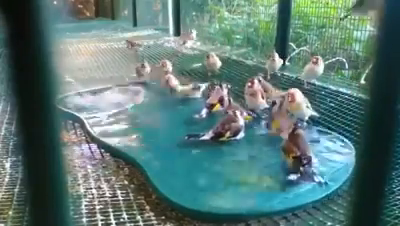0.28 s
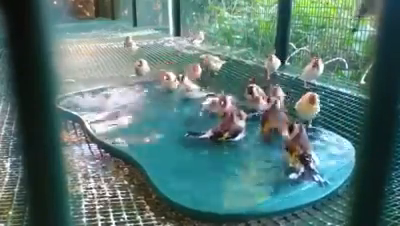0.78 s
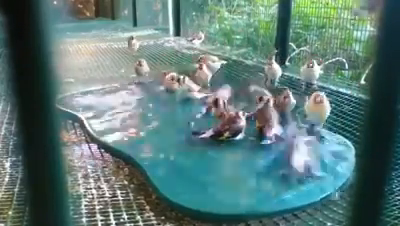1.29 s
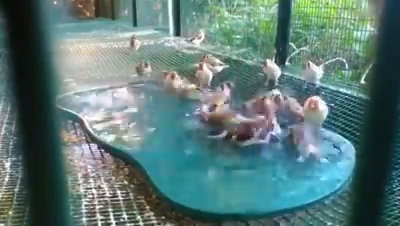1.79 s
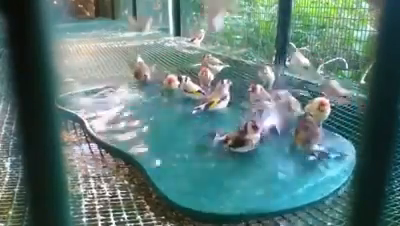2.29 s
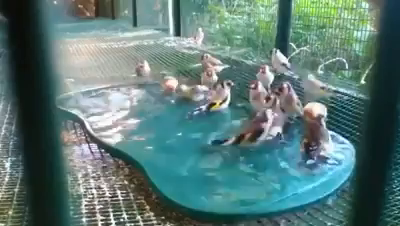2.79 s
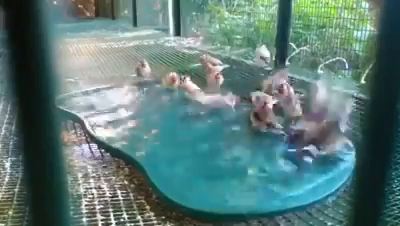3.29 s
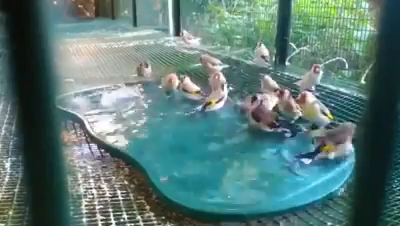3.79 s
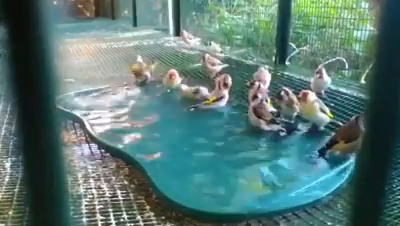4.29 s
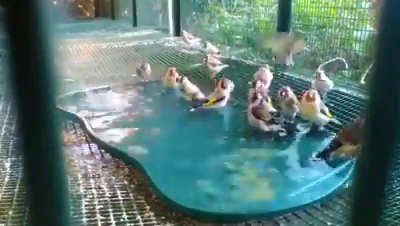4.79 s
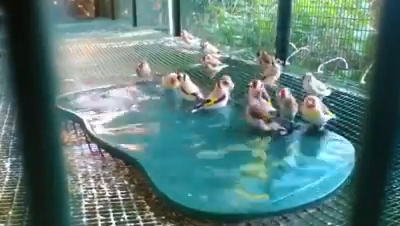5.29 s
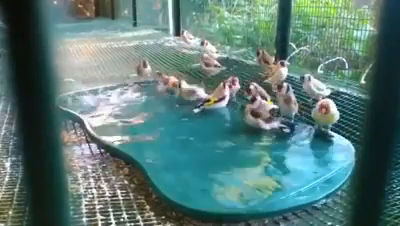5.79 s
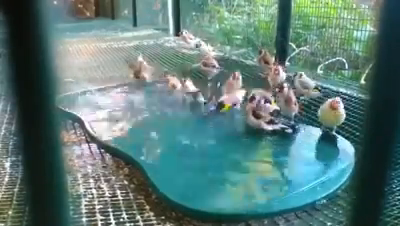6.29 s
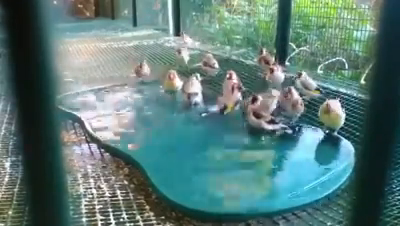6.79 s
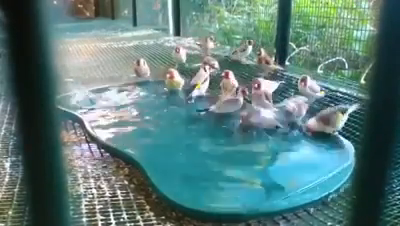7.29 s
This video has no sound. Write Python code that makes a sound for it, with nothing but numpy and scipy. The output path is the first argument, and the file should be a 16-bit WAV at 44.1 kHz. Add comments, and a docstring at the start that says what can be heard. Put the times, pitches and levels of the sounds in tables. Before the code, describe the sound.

A flock of small finches bathes in a shallow tray inside an aviary. A wet plop opens, then soft pattering, fizzing droplets and ragged wing flutter continue throughout. Near two seconds a hollow object is knocked and rattles, the hardest knock at about two and a half seconds, amid quick high chirps. Afterwards it quietens to scattered splashes and bubbles, with a small clatter on the wire mesh near the end. Close pickup, short cage echo.

```python
"""Small finches bathe in a shallow tray of water in an aviary: beating wings throw spray and droplets.
The splashing is shaped noise and random impacts; bubbles and plops are short rings that swell and die.
Chirps are gliding sines with rasp, and wing flurries are ragged bands of noise that sink in pitch.
Now and then something hollow is knocked and rattles as a set of decaying modes, and a bird lands on
the mesh, a bank of noisy resonances. The cage rings along and the walls give a short echo."""
import sys
import numpy as np
from scipy import signal
from scipy.fft import rfft, irfft
from scipy.io import wavfile

SR = 44100
rng = np.random.default_rng(int(sys.argv[2]) if len(sys.argv) > 2 else 0)


def output_pcm(signal):
    """Save a mono or channel-first signal as 16-bit PCM at the path in sys.argv[1].

    Samples are clipped to [-1, 1] before scaling.
    """
    pcm = np.clip(np.atleast_2d(signal).T, -1, 1) * 32767
    wavfile.write(sys.argv[1], SR, np.round(pcm).astype(np.int16))


N = 331632
T = np.arange(N) / SR
LEAD_S = 0.03  # time allowed for a sound to build up before its peak
WINGBEAT_HZ = 21.4  # middle rate of the beating wings

# how busily the flock bathes: (time [s], level [dB])
BATHING_LEVEL = [(0, -48), (.14, -48), (.3, -46.5), (.7, -47.5), (1.3, -49), (2.05, -45), (2.35, -46),
                 (3.1, -50), (3.4, -46.5), (3.6, -50), (4.12, -52), (4.28, -54), (4.42, -51.5),
                 (4.95, -50.5), (5.2, -47), (5.5, -49.5), (6.25, -47), (6.55, -51), (6.9, -47.5),
                 (7.52, -50)]


def amp(db):
    """Decibels to gain."""
    return 10 ** (np.asarray(db) / 20)


def unit(x):
    """Scale to rms 1."""
    return x / np.sqrt(np.mean(x ** 2))


def add(out, s, x):
    """Mix x into out from time s."""
    i = int(s * SR)
    x, i = x[max(-i, 0):], max(i, 0)
    out[i:i + len(x)] += x[:max(N - i, 0)]


def band(x, low_hz, high_hz, order=2):
    """Band-pass."""
    edges = np.clip([low_hz, max(high_hz, low_hz + 20)], 10, SR / 2 - 10)
    return signal.sosfilt(signal.butter(order, edges, "band", fs=SR, output="sos"), x)


def colour(x, points):
    """Shape by a spectrum of (frequency [Hz], level [dB]) points."""
    hz, db = np.transpose(points)
    f = np.maximum(np.fft.rfftfreq(N, 1 / SR), 1)
    return irfft(rfft(x) * amp(np.interp(np.log(f), np.log(hz), db)), N)


def walk(rate_hz):
    """Smooth random drift of spread 1 that takes a new value rate_hz times a second."""
    knots = rng.standard_normal(N // 10)
    return np.interp(T * rate_hz, np.arange(len(knots)), knots) * np.sqrt(3 / 2)


def swell(t, rise_s, decay_s):
    """Envelope that grows towards time 0 and dies away after it."""
    return np.exp(np.minimum(t / rise_s, -t / decay_s))


def grit(n, grain_db=4, size=30):
    """Noise broken into tiny grains (size in samples) of uneven strength."""
    grains = np.repeat(np.clip(rng.standard_normal(n // size + 1), -2, 2), size)[:n]
    return rng.standard_normal(n) * amp(grain_db * grains)


def impacts(per_s, spread_db):
    """Randomly timed droplet impacts, mostly small with a few large."""
    size = amp(spread_db * np.minimum(rng.exponential(size=N), 4))
    return (rng.random(N) < per_s / SR) * size * rng.choice([-1, 1], N)


def bubble(hz, swell_s, glide=0.00082):
    """A trapped air pocket gives a short ring, practically steady in pitch, that swells and dies away."""
    t = T[:int(10 * swell_s * SR) + 2]
    age = t / swell_s
    envelope = age ** 2 * np.exp(2 - 2 * age)
    return envelope * np.sin(2 * np.pi * hz * t * (1 + glide * (age - 1)))


def aviary(x, room_db=-11, room_t60_s=0.32, treble_t60_s=0.31, build_s=0.0041, ring_db=-1):
    """The cage rings along; near surfaces answer, then a diffuse tail, lows and treble fading almost as one."""
    # thin resonances of the cage that every sound sets off: (frequency [Hz], width [Hz], level [dB])
    cage_modes = [(800, 12, -13), (1745, 10, 1.5), (2106, 42, -0.5), (2810, 23, -14.5), (3000, 17, -18),
                  (3214, 52, -7.5), (3830, 43, -4), (5050, 17, -2.5), (6100, 190, -10)]
    # early reflections off floor and near walls: (delay [s], level [dB])
    reflections = [(.0051, -17.5), (.0084, -22.5), (0.023, -25)]
    ringing = sum(amp(db + ring_db) * band(x, hz - width / 2, hz + width / 2, order=1)
                  for hz, width, db in cage_modes)
    x = x + ringing
    t = T[:SR * 2 // 3]
    low = band(rng.standard_normal(len(t)), 110, 3800) * amp(-60 * t / room_t60_s)
    treble = band(rng.standard_normal(len(t)), 3900, 10000) * amp(-60 * t / treble_t60_s)
    tail = (low + treble) * (1 - np.exp(-t / build_s))
    response = amp(room_db) * tail / np.linalg.norm(tail)
    for s, db in reflections:
        response[int(s * SR)] += amp(db)
    return x + signal.fftconvolve(x, response)[:N]


def rattle(count=6, uneven=0.4, scatter_db=3, hard_db=-16, spot_hz=1018, wander=0.02):
    """The hollow thing chatters in soft, uneven taps: (time [s], level [dB], hardness [dB], pitch [Hz])."""
    # runs of taps: (time [s], level [dB], time between taps [s])
    runs = [(2.133, -34.5, 0.035), (2.29, -39.5, 0.034), (2.949, -40, 0.034)]
    taps = []
    for s, db, gap_s in runs:
        for k, (late, size, spot) in enumerate(rng.uniform(-1, 1, (count, 3))):
            tap_s = s + gap_s * (k + uneven * late)
            taps.append((tap_s, db + scatter_db * size, hard_db, spot_hz * (1 + wander * spot)))
    return taps


def knocks(peak_s=0.0047, width_s=0.0035, cluster_db=-19, cluster_s=0.039, build_s=0.0036,
           crack_db=-17, crack_s=0.031, rasp_db=-27, rasp_s=0.012, thud_db=-47, thud_s=0.0087,
           soft_hz=1200, push_s=0.00066, brush_s=0.007, detune=0.013, scatter_db=2):
    """A blow tocks at the struck spot's pitch, then modes ring in a fresh mix; soft blows lack high ones."""
    # hollow knocks, bounces and taps: (time [s], level [dB], hardness [dB], pitch at the struck spot [Hz])
    blows = [(1.7408, -15, -10.5, 994), (1.7522, -19, -10, 1027), (1.7604, -19.5, -7, 1140),
             (2.143, -29, -21, 1030), (2.168, -31, -27, 1030), (2.185, -24, -28, 1023),
             (2.218, -40, -16.5, 965), (2.251, -29, -21, 1047), (2.275, -35, -17, 1090),
             (2.313, -29.5, -10, 1100), (2.333, -32.5, -17, 975), (2.459, -36.5, 4.5, 985),
             (2.5082, -8.5, -3, 976), (2.5167, -18.5, -3.5, 1080), (2.5280, -22, 3.5, 1045),
             (2.5382, -20, -9, 1054), (2.548, -30, -11.5, 1030), (2.562, -36, -1, 1005),
             (2.570, -36, -12, 985), (2.883, -39, -5, 1030), (2.972, -29.5, -7.5, 1075),
             (2.986, -38, 0, 1210), (3.048, -31.5, -13, 1030), (3.062, -35, -3, 1095),
             (3.288, -39.5, -13, 990)]
    # what the knocked thing rings with: (frequency [Hz], level [dB], time to fall 60 dB [s])
    hollow_modes = [(347, -43, 0.067), (505, -30, 0.15), (582, -41, 0.065), (828, -16.5, 0.039),
                    (947, -23, 0.36), (1120, -28, 0.15), (1188, -17.5, 0.17), (1680, -21.5, 0.21),
                    (2030, -20, 0.11), (2310, -8.5, 0.088), (2450, -15, 0.066), (3060, -19.5, 0.15),
                    (3750, -6, 0.018), (3800, -10, 0.05)]
    # its crowd of close modes, which beat unevenly as they fade: (low edge [Hz], high edge [Hz])
    cluster_edges = (880, 1177)
    out, t = np.zeros(N), T[:SR // 2] - LEAD_S
    n, age = len(t), np.maximum(t, 0)
    for s, db, hard_db, spot_hz in blows + rattle():
        tock = np.exp(-((t - peak_s) / width_s) ** 2) * np.sin(2 * np.pi * spot_hz * t)
        ring = 0
        for hz, mode_db, t60 in hollow_modes:
            size, shift, phase = rng.standard_normal(3)
            octaves_up = max(np.log2(hz / soft_hz), 0)
            gain = amp(mode_db + scatter_db * size + hard_db * octaves_up)
            tone = np.sin(2 * np.pi * (hz * (1 + detune * shift) * age + phase))
            ring = ring + gain * amp(-60 * age / t60) * tone
        cluster = unit(band(rng.standard_normal(n), *cluster_edges, order=3))
        cluster = cluster * (1 - np.exp(-age / build_s)) * np.exp(-age / cluster_s)
        # the contact scrapes a little before it lands, and the floor gives a faint thud
        crack = unit(band(grit(n), 670, 2830)) * swell(t, brush_s, crack_s)
        rasp = unit(band(grit(n), 4300, 6600)) * swell(t, brush_s, rasp_s)
        thud = unit(band(rng.standard_normal(n), 25, 160)) * swell(t, brush_s, thud_s)
        body = tock + (1 - np.exp(-age / push_s)) * ring + amp(cluster_db) * cluster + amp(thud_db) * thud
        contact = amp(hard_db) * (amp(crack_db) * crack + amp(rasp_db) * rasp)
        add(out, s - LEAD_S, amp(db) * (body + contact))
    return out


def landing(ring_s=0.07, ring_db=-17, rise_s=0.00076, damping=-0.62):
    """Each footfall sets the wire mesh clattering; its low resonances ring on after the high ones."""
    # a bird lands on the wire mesh and shakes it: (time [s], level [dB], decay time [s])
    footfalls = [(6.938, -28, 0.034), (6.949, -24.5, 0.016), (6.9669, -23.5, .012), (7.002, -29, 0.018)]
    # what the mesh rings with: (frequency [Hz], width [Hz], level [dB])
    mesh_modes = [(470, 220, -1.5), (873, 200, -4), (1150, 200, -4.5), (1460, 140, -5.5), (1804, 190, 2),
                  (2160, 210, -2), (2480, 89, 3.5), (2840, 190, 1), (3350, 540, -7)]
    out, t = np.zeros(N), T[:SR // 2] - LEAD_S
    middle_hz = np.median(np.array(mesh_modes)[:, 0])
    for s, db, decay_s in footfalls:
        wires = [amp(mode_db) * band(grit(len(t)), hz - width / 2, hz + width / 2)
                 for hz, width, mode_db in mesh_modes]
        clatter = 0
        for wire, (hz, _, _) in zip(wires, mesh_modes):
            longer = (hz / middle_hz) ** damping  # decay time goes as pitch to this power
            strike = swell(t, rise_s, decay_s * longer)
            after_ring = amp(ring_db) * swell(t, rise_s, ring_s * longer)
            clatter = clatter + wire * (strike + after_ring)
        add(out, s - LEAD_S, amp(db) * clatter / np.std(sum(wires)) / 2)
    return out


def chirps(waver=0.071, rasp_db=-7, flutter_db=2.5, rasp_octaves=0.18):
    """Gliding whistles and quick strokes; rough ones waver in pitch and strength and break into a rasp."""
    # high chirps and a few low, soft tones near 800-1000 Hz, perhaps the hollow thing ringing:
    # (time [s], level [dB], length [s], start pitch [Hz], end pitch [Hz], roughness [0-1])
    whistles = [(0.402, -32.5, 0.017, 1790, 1810, 0.16), (1.474, -44.5, .025, 5470, 5640, 0.5),
                (1.734, -43.5, 0.038, 6250, 6380, 0.16), (1.896, -42.5, 0.057, 957, 884, 0.25),
                (1.937, -40.5, 0.016, 4710, 4900, 0.1), (1.973, -38.5, 0.061, 2740, 3160, 0.08),
                (2.173, -33, 0.036, 5640, 5870, 0.2), (2.239, -32, 0.035, 3686, 3610, 0.26),
                (2.309, -23, .0046, 2830, 3600, 0.3), (2.318, -29, 0.0052, 3400, 3900, 0.2),
                (2.33, -18, 0.0024, 2930, 3850, 0), (2.335, -27, .003, 2600, 3200, .3),
                (2.339, -21.5, 0.0047, 3820, 3000, .3), (2.3445, -27, 0.0033, 3640, 3000, .3),
                (2.35, -30, .006, 3260, 2800, .6), (2.36, -25, 0.026, 3560, 3890, 0.08),
                (2.391, -33, 0.024, 2546, 2580, 0.35), (2.411, -35, 0.021, 2750, 3110, .6),
                (2.486, -30, 0.022, 3114, 2760, 0.9), (2.866, -40, 0.06, 966, 937, 0.42),
                (3.012, -39.5, 0.15, 976, 944, 0.14), (3.224, -30, 0.0085, 3760, 3550, 0.3),
                (3.253, -30.5, 0.017, 3890, 3740, 0.25), (3.27, -29, 0.0095, 3300, 3150, 0.5),
                (3.284, -26.5, 0.02, 3744, 3580, 0.3), (3.29, -34, 0.033, 3310, 3270, 0.5),
                (3.374, -29.5, 0.015, 2930, 3760, 0.65), (3.39, -29, 0.0044, 3580, 3370, 0.4),
                (4.027, -45.5, 0.041, 4860, 4660, 0.3), (4.924, -35, 0.021, 5300, 5600, 0.06),
                (4.927, -41, 0.012, 6370, 6230, 0.14), (5.139, -29.5, 0.025, 2990, 3150, 0.67),
                (5.192, -51, 0.045, 5240, 5240, .1), (5.37, -51, 0.064, 5400, 6400, 0.74),
                (5.616, -33, 0.0071, 5120, 4900, 0.15), (6.106, -41, .018, 963, 946, 0.2),
                (6.138, -41, .025, 780, 737, .4), (6.23, -42.5, 0.047, 825, 846, 0.56),
                (6.33, -44, 0.039, 786, 874, .3)]
    out = np.zeros(N)
    pitch_walk, level_walk = walk(1300), np.clip(walk(450), -1.5, 1.5)
    spread = 2 ** rasp_octaves  # half-width of the rasp's band
    for s, db, length, start_hz, end_hz, rough in whistles:
        n, i = int(length * SR), int(s * SR)
        hz = np.linspace(start_hz, end_hz, n) * (1 + waver * rough * pitch_walk[i:i + n])
        shape = signal.windows.tukey(n, .7) * amp(flutter_db * rough * level_walk[i:i + n])
        whistle = np.sin(2 * np.pi * np.cumsum(hz) / SR)
        # the end of a longer noise, so that the filter has settled
        rasp = band(rng.standard_normal(SR // 4), hz.mean() / spread, hz.mean() * spread, order=3)
        rasp = unit(rasp)[-n:]
        add(out, s, amp(db) * shape * (whistle + rough * amp(rasp_db) * rasp))
    return out


def flurries(grain_db=3.5, ragged_db=2, lag=0.11, tilt_db=-5):
    """Wings churn air and water in a throbbing, ragged rush that swells, sinks in pitch and dies away."""
    # wing flurries: (time [s], level [dB], rise [s], decay [s], low edge [Hz], high edge [Hz])
    rushes = [(.015, -44, 0.025, 0.017, 630, 1120), (0.175, -39, 0.057, 0.025, 910, 1820),
              (2.057, -51, 0.14, 0.34, 172, 880), (2.41, -41, 0.0065, 0.033, 460, 693),
              (2.508, -34, 0.025, 0.022, 415, 668), (3.23, -48.5, 0.059, 0.08, 224, 790),
              (4.154, -39, 0.0093, 0.035, 710, 2020), (4.68, -51.5, 0.015, 0.1, 375, 790),
              (4.93, -54, 0.032, 0.091, 247, 567), (5.629, -37.5, 0.012, 0.013, 370, 940),
              (6.045, -38.5, 0.084, 0.2, 399, 1077), (6.151, -45, 0.12, 0.12, 86, 410),
              (6.941, -38, 0.046, 0.14, 261, 845)]
    out, t = np.zeros(N), T[:SR]
    feathers = rng.standard_normal(N) * amp(grain_db * np.clip(walk(150), -2, 2))
    for s, db, rise_s, decay_s, low_hz, high_hz in rushes:
        edges = np.geomspace(high_hz, low_hz, 4)
        for top, bottom in zip(edges, edges[1:]):
            # per octave down, a band starts later by a share of the rise and changes by tilt_db
            octaves = np.log2(high_hz / top)
            age = np.maximum(t - lag * rise_s * octaves, 0)
            shape = np.minimum(age / rise_s, 1) * np.exp(-np.maximum(age - rise_s, 0) / decay_s)
            # strength differs from stroke to stroke
            beats = amp(ragged_db * np.clip(walk(2 * WINGBEAT_HZ)[:SR], -1.5, 1.5))
            rush = band(feathers[rng.integers(N - SR):][:SR], bottom, top, order=3)
            add(out, s, amp(db + tilt_db * octaves) * shape * beats * unit(rush) / 2)
    return out


def plops(bubble_db=-2, slosh_db=-14, rise_s=0.0038, decay_s=0.01, spread=1.08, tick_db=-12, tick_s=0.00079,
          count=5, small_db=-8, trail_s=0.07, octaves=0.19, cycles=3.6):
    """The surface breaks with a wet tick and traps a bubble; a slosh and a few smaller bubbles follow."""
    # the larger bubbles: (time [s], level [dB], pitch [Hz])
    large_bubbles = [(0.0, -14, 1863), (.007, -39, 1880), (0.0175, -44, 1860), (0.0528, -25, 1730),
                     (0.1708, -28.5, 1765), (0.184, -29, 1900), (.187, -37, 1420), (.199, -36, 1620),
                     (.221, -37.5, 1240), (0.997, -32, 2850), (1.1, -34.5, 1920), (1.235, -34, 2020),
                     (1.3773, -31.5, 2060), (1.765, -23, 2900), (1.914, -25, 2870), (2.719, -28.5, 1830),
                     (3.473, -31, 2190), (3.713, -28.5, 3740), (4.085, -26.5, 1980), (4.137, -38, 1710),
                     (5.212, -35, 2200), (5.224, -24.5, 2210), (5.297, -40, 2100), (5.313, -37.5, 2080),
                     (5.324, -39, 2170), (5.663, -30.5, 1270), (5.847, -36, 1860), (6.212, -23, 2160),
                     (6.2643, -30, 2000), (6.4695, -29, 1960), (6.667, -31, 1810), (6.743, -34, 1700),
                     (6.818, -36, 2120), (7.0559, -33.5, 2100), (7.132, -35, 1980), (7.1938, -32, 2040),
                     (7.257, -29, 2040), (7.272, -35, 1840), (7.298, -34, 1730), (7.377, -32, 2020)]
    out, t = np.zeros(N), T[:SR // 6] - LEAD_S
    for s, db, hz in large_bubbles:
        swell_s = cycles / hz  # swells for this many cycles, so low bubbles ring longer
        slosh = unit(band(grit(len(t)), hz / spread, hz * spread)) * swell(t - swell_s, rise_s, decay_s)
        tick = unit(band(grit(len(t)), 1400, 4000)) * swell(t, tick_s / 10, tick_s)
        add(out, s, amp(db + bubble_db) * bubble(hz, swell_s))
        add(out, s - LEAD_S, amp(db) * (amp(slosh_db) * slosh + amp(tick_db) * tick))
        for late, pitch in rng.random((count, 2)):
            small_hz = hz * 2 ** (octaves * (2 * pitch - .5))
            small = bubble(small_hz, cycles / small_hz / 2)
            add(out, s + trail_s * late, amp(db + small_db - 10 * late) * small)
    return out


def splats(after_db=-14, after_s=0.009, edge_db=-18, dip_s=0.0091, slap_s=0.00013, octaves=0.44):
    """A wing dips in, slaps the water in a brief burst, then its droplets trail off."""
    # sharp splashes of wings and feet: (time [s], level [dB], centre [Hz], decay time [s])
    splashes = [(0.238, -25, 4070, 0.0022), (0.269, -27, 2250, 0.0031), (0.344, -33, 2260, 0.014),
                (0.485, -20.5, 2590, 0.0044), (0.674, -31, 3100, 0.011), (1.427, -27.5, 2560, 0.0053),
                (1.442, -36.5, 2550, .022), (1.614, -30, 2170, 0.0046), (1.933, -31, 2300, 0.0096),
                (2.173, -28.5, 3650, 0.0032), (2.31, -20.5, 2700, 0.02), (2.336, -22.5, 2900, 0.019),
                (2.483, -19, 2760, 0.0022), (2.639, -34, 2010, 0.01), (2.73, -37, 1950, 0.019),
                (2.761, -32, 2700, 0.027), (2.788, -33, 2760, 0.0085), (2.871, -37, 2290, 0.0032),
                (2.966, -37, 2280, 0.0039), (3.227, -33, 3160, 0.023), (3.252, -39, 3380, 0.023),
                (3.284, -32, 3330, 0.02), (3.378, -31.5, 3150, 0.022), (3.999, -38.5, 2140, 0.012),
                (4.088, -35, 1980, 0.0019), (4.13, -38, 1920, 0.016), (4.158, -39.5, 2060, 0.032),
                (5.124, -34, 3100, .012), (5.138, -21, 2590, 0.0033), (5.146, -34, 3050, .024),
                (5.236, -39.5, 2600, 0.036), (5.361, -32, 4160, 0.0037), (5.379, -33.5, 3870, 0.035),
                (5.901, -38, 2300, .003), (6.087, -33, 1900, 0.0056), (6.314, -39.5, 2200, 0.0034),
                (6.939, -31.5, 3250, 0.011), (7.351, -41, 2370, .005)]
    out, t = np.zeros(N), T[:SR // 5] - LEAD_S
    spread = 2 ** octaves  # half-width of a splash's band
    for s, db, hz, decay_s in splashes:
        noise = grit(len(t))
        core = unit(band(noise, hz / spread, hz * spread, order=3))
        burst = core + amp(edge_db) * unit(band(noise, 640, 3200))
        slap = band(burst * swell(t, slap_s, decay_s), 1000, 9000)
        trail = burst * swell(t, dip_s, after_s) / 2
        add(out, s - LEAD_S, amp(db) * (slap / np.abs(slap).max() + amp(after_db) * trail))
    return out


def drips(rise_s=0.0001, decay_s=0.0007, low_hz=1900, high_hz=6500):
    """A heavy drop strikes with a brief, bright click."""
    # heavy drops that land close by: (time [s], peak level [dB])
    heavy_drops = [(.2392, -32), (.486, -36), (0.951, -40), (1.046, -37), (1.59, -29), (1.9135, -30.5),
                   (1.9447, -37), (2.457, -39), (2.482, -32), (2.721, -38), (2.760, -41), (3.3834, -29),
                   (3.696, -32.5), (5.3612, -37), (5.527, -40), (5.619, -33), (5.699, -43), (5.769, -32),
                   (5.904, -31), (6.276, -35), (6.82, -44), (7.507, -29.5)]
    out, t = np.zeros(N), T[:SR // 20] - LEAD_S
    for s, db in heavy_drops:
        click = band(rng.standard_normal(len(t)) * swell(t, rise_s, decay_s), low_hz, high_hz)
        add(out, s - LEAD_S, amp(db) * click / np.abs(click).max())
    return out


def ticks(gain_db=-10, per_s=70, spread_db=2.5, decay_s=0.0026):
    """Single drops flung by the bathing fall back with a small wet tick of decaying noise."""
    t = T[:SR // 40]
    landings = np.abs(signal.fftconvolve(np.abs(impacts(per_s, spread_db)), np.exp(-t / decay_s))[:N])
    wet = band(landings * rng.standard_normal(N), 1870, 3530)
    return amp(np.interp(T, *np.transpose(BATHING_LEVEL)) + gain_db) * unit(wet)


def crackle(gain_db=6, count=420, spread_db=10, decay_s=0.00013, low_hz=1750, high_hz=4600):
    """Fine droplets hit the surface one by one in crisp clicks, each with its own brightness."""
    out, t = np.zeros(N), T[:SR // 100]
    for when, size, pitch in rng.random((count, 3)):
        hz = low_hz * (high_hz / low_hz) ** pitch
        click = np.exp(-t / decay_s) * np.sin(2 * np.pi * hz * t)
        add(out, when * N / SR, amp(gain_db + spread_db * size ** 2) * click)
    return amp(np.interp(T, *np.transpose(BATHING_LEVEL))) * band(out, low_hz, high_hz, order=1)


def bathing(drops_db=-4, wash_db=-9, spray_db=2, steady_spray_db=-20.5, beat_db=1, patchy_db=4.5,
            shake_s=0.049, fizz_count=1300, fizz_db=-3, gurgle_count=420, gurgle_db=-5, bubble_spread_db=11):
    """Beating wings throw droplets that patter back, with a wash, small bubbles and a fine spray."""
    # colour of the splashing water: (frequency [Hz], level [dB])
    water = [(25, -26.5), (55, -21), (100, -8), (230, -10.5), (380, -5), (700, -4), (1100, -1.5),
             (1480, -4), (1850, 0), (2450, -7), (3600, -4), (5200, -7), (6800, -15.5), (10000, -20)]
    # a bird shakes its wet wings and throws a cloud of fine spray: (time at the height [s], level [dB])
    wing_shakes = [(.25, -55.5), (.72, -60), (1.05, -54.5), (1.45, -53), (1.61, -54.5), (1.93, -78),
                   (2.271, -50), (2.85, -59.5), (4.12, -56.5), (4.54, -57), (5.38, -70), (5.7, -55),
                   (5.9, -60), (7.47, -64)]
    activity = amp(np.interp(T, *np.transpose(BATHING_LEVEL)))
    # each shake is a bell-shaped swell with standard deviation shake_s
    shaken = sum(amp(db + spray_db) * np.exp(-.5 * ((T - s) / shake_s) ** 2) for s, db in wing_shakes)
    spray = np.hypot(amp(steady_spray_db) * activity, shaken)
    beat_hz = WINGBEAT_HZ * (1 + 0.56 * walk(5.1))
    wings = amp(beat_db * np.sin(2 * np.pi * np.cumsum(beat_hz) / SR))
    # each size of droplet has its own pitch range and comes in its own showers
    edges = np.geomspace(250, 10000, 15)
    drops = 0
    for low, high in zip(edges, edges[1:]):
        shower = impacts(per_s=600, spread_db=1.5) * amp(patchy_db * walk(45))
        drops = drops + band(shower, low, high)
    drops = unit(colour(drops, water))
    wash = unit(colour(rng.standard_normal(N), water))
    mist = unit(band(impacts(per_s=2500, spread_db=2.0), 1400, 5730))
    bubbles = np.zeros(N)
    for when, pitch, size, ring in rng.random((fizz_count, 4)):
        # fizz: higher bubbles are weaker
        db = fizz_db + bubble_spread_db * size ** 2 - 7 * pitch
        add(bubbles, when * N / SR, amp(db) * bubble(1700 * 3.1 ** pitch, 0.00028 + 0.0027 * ring))
    for when, pitch, size in rng.random((gurgle_count, 3)):
        # gurgle: dipping heads leave larger bubbles
        db = gurgle_db + bubble_spread_db * size ** 2
        add(bubbles, when * N / SR, amp(db) * bubble(1650 + 900 * pitch, 0.0011))
    thrown = activity * (amp(drops_db) * drops + bubbles) + spray * mist
    return wings * thrown + activity * amp(wash_db) * wash


def scene():
    """The flock, its water and the knocked things, all sounding inside the aviary."""
    water = bathing() + ticks() + crackle() + drips() + plops() + splats()
    whistles_and_wings = chirps() + flurries()
    objects = knocks() + landing()
    return aviary(water + whistles_and_wings + objects)[None]


def record(dry):
    """The recorder cuts the top with a steep low-pass at 10 kHz."""
    return signal.sosfilt(signal.ellip(10, .2, 70, 10000, fs=SR, output="sos"), dry)


dry = scene()
out = record(dry)
output_pcm(out)
```